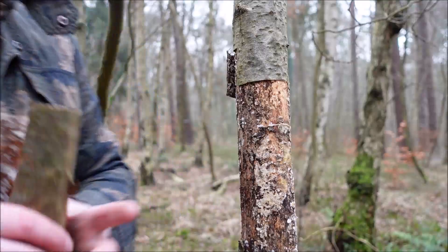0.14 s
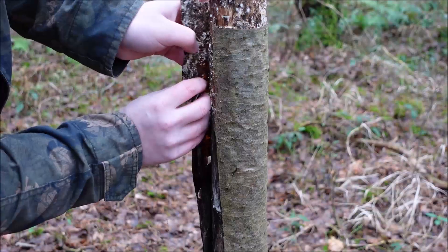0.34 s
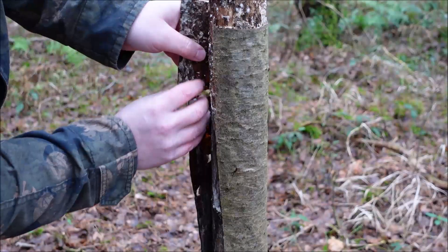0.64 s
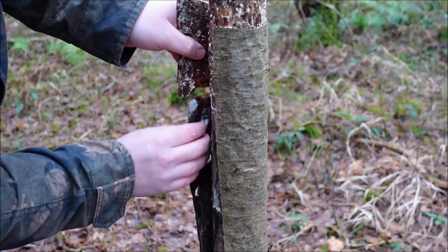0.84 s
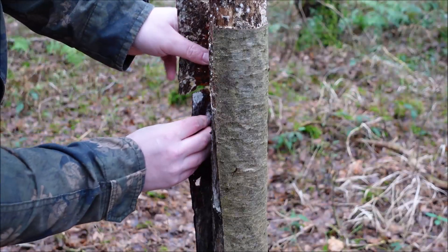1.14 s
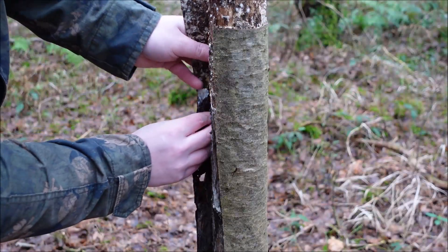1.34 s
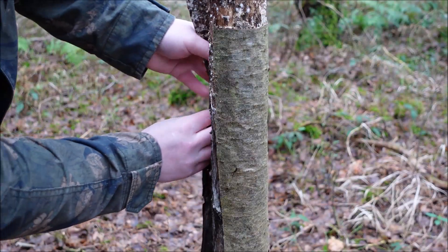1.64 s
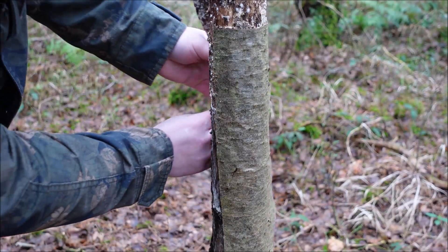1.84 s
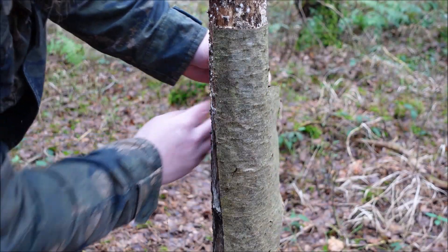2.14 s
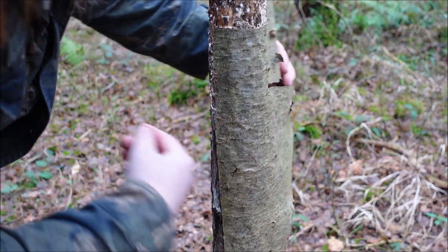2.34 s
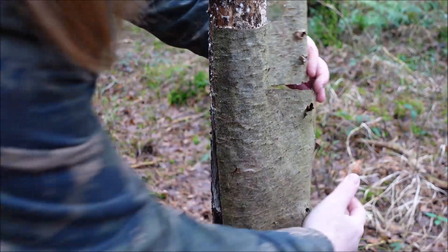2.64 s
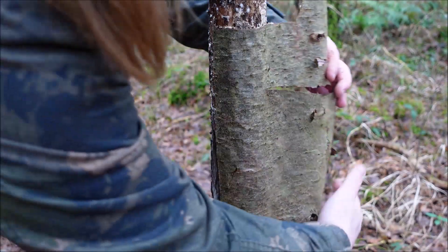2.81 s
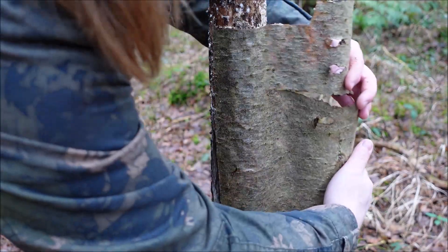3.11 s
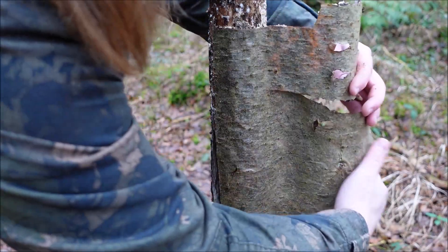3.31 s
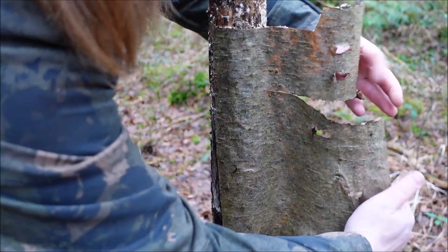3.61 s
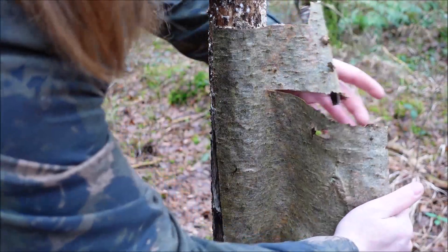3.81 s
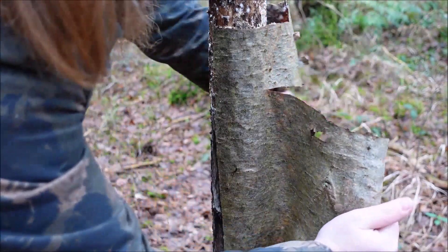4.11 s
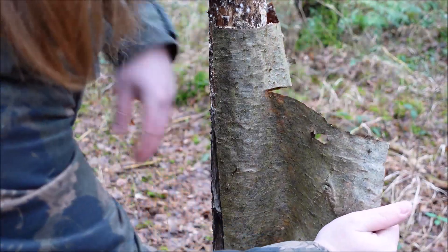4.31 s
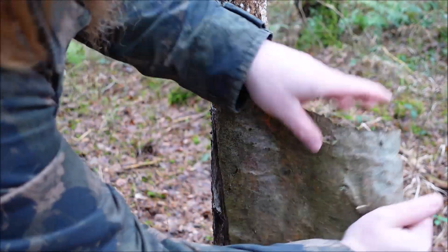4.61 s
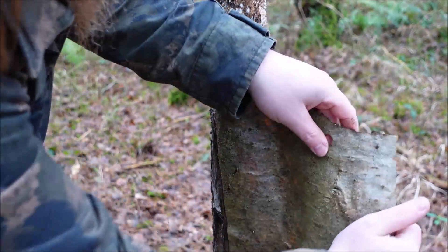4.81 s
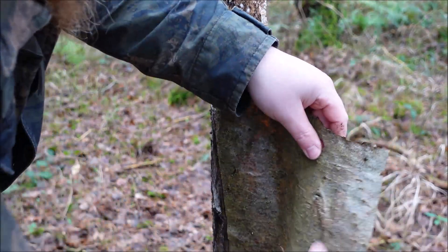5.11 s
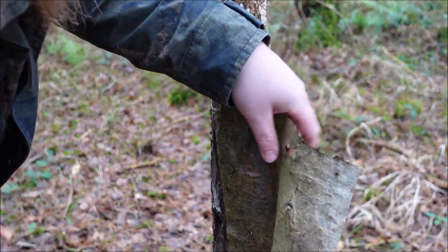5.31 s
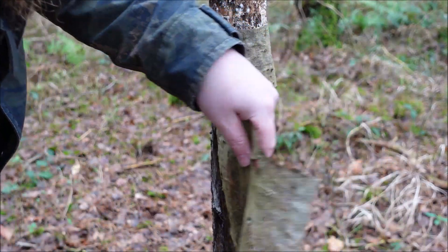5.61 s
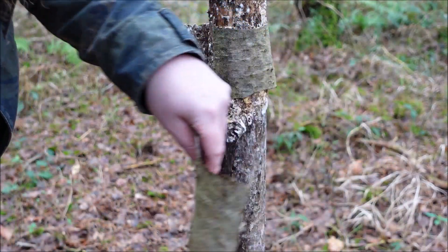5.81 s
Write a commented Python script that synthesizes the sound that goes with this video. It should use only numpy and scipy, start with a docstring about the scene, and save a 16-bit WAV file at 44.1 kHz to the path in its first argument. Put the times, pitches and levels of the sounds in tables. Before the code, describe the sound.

A sharp, close crack comes right at the start as hands peel stiff, dry bark from a thin trunk. Small irregular ticks and snaps follow, with clearer ones near 0.8, 1.2 and 2.1 seconds. Fingers scrape and rustle softly on the bark throughout. Around 2.7 seconds a sleeve swishes faintly, followed by a loud cluster of cracks at 2.8. Snaps then come more often, with strong ones near 3.6, 3.9 and 4.4 seconds. From about 4.5 to 4.8 seconds the sheet tears free in a dense, scraping rush of cracks, the loudest moment. The loose bark gives slightly hollow snaps and rustles, with another sharp cluster around 5.4 to 5.5 seconds and lighter ticks until about 6. A faint, steady, distant roar lies behind everything in the quiet wood.

```python
"""A sharp crack, then dry snaps one by one: two hands peel stiff bark from a thin trunk in a quiet wood.
Each fibre that breaks makes a tick, rings its patch of bark and shakes the whole curled sheet.
About 4.5 s in, the snaps come in a rush as the sheet tears free.
Fingers scrape and rustle on the bark, a sleeve swishes once, and a soft roar lies far behind."""
import sys
import numpy as np
from scipy import signal
from scipy.fft import rfft, irfft
from scipy.io import wavfile
from scipy.ndimage import uniform_filter1d

SR = 44100
rng = np.random.default_rng(int(sys.argv[2]) if len(sys.argv) > 2 else 0)


def transcribe(signal):
    """Save signal, clipped to [-1, 1], as a 16-bit WAV file at the path in sys.argv[1]."""
    frames = np.atleast_2d(signal).T
    limited = np.clip(frames, -1, 1)
    pcm = np.round(limited * 32767).astype(np.int16)
    wavfile.write(sys.argv[1], SR, pcm)


N = 262395
TIME = np.arange(N) / SR

# The main fibre snaps. Tick and thump are set against the bark's ring; decay is the time to fade 60 dB.
# (time [s], level [dB], pitch of the freed patch [Hz], tick [dB], thump [dB], decay [ms])
FIBRE_SNAPS = [(0.0421, -9.5, 2180, -8.5, -27, 7.3), (0.045, -17, 1050, -33, -48, 22),
               (0.112, -33.5, 4940, -4, -28, 4.3), (0.144, -29.5, 1120, -17, -26, 42),
               (0.213, -33, 1067, -20, -27.5, 38), (0.3727, -35.5, 2500, 2.5, -29.5, 28),
               (0.3856, -29, 2470, 1, -27, 16), (0.4, -27, 2400, -46, -35, 9.4),
               (0.4276, -31.5, 2340, 2.5, -39, 3.1), (0.5433, -28.5, 2430, -5.5, -40, 4.3),
               (0.6117, -32.5, 2180, -3.5, -38, 11), (0.677, -38, 2370, 7.5, -30, 4.3),
               (0.822, -16, 2000, 0.5, -50, 9.7), (0.9208, -30, 5460, -24, -36, 2.8),
               (1.024, -36, 5900, -0.5, -28, 1.7), (1.192, -15.5, 2170, -10, -42, 8.1),
               (1.1966, -18.5, 2070, -1.5, -41, 8.8), (1.2191, -26, 7500, -2, -28, 9.5),
               (1.2244, -28.5, 2250, -7, -10, 11), (1.2617, -17, 1900, -20, -8, 7.3),
               (1.2744, -30, 2040, -15, -27, 14), (1.4602, -30, 1072, -19, -38, 36),
               (1.513, -33, 1780, -9.5, -18, 18), (1.6492, -36, 1830, -9, -25, 21),
               (1.7125, -33.5, 4840, -5, -37, 4.5), (1.753, -33, 4700, -1, -33, 60),
               (1.9546, -32.5, 3950, -7, -6, 27), (1.9856, -27.5, 1017, -5.5, -10, 50),
               (1.9951, -26.5, 970, 1.5, -38, 5), (2.0709, -34, 6300, 11.5, -30, 4),
               (2.104, -30.5, 3980, -2, -17, 30), (2.1118, -14, 920, -66, -4, 23.5),
               (2.5213, -29.5, 796, -24, 1, 29), (2.7021, -13.5, 2140, -35, -49, 5.1),
               (2.784, -13, 2040, -8, -7.5, 7.3), (2.801, -21, 2060, -31, 1.5, 23),
               (2.82, -6, 2584, -15, -11.5, 9.2), (2.8234, -14, 1140, -21, -6, 20),
               (2.9624, -34, 1750, -28, -12, 19), (2.9795, -34, 3140, -5, -29, 2.9),
               (3.0403, -15.5, 2420, -18.5, -34, 3.9), (3.1479, -26.5, 2550, -27, -17, 13),
               (3.2308, -34.5, 1830, -8, -33, 11), (3.2677, -19.5, 2860, -5, -7, 24),
               (3.338, -21.5, 3160, -3, -12.5, 14.5), (3.3874, -33.5, 5840, 0, -24, 9.7),
               (3.4516, -29.5, 1590, -6, -3.5, 9.8), (3.563, -26, 2860, -12, -6, 47),
               (3.5765, -7.5, 1870, -15.5, -41, 7.8), (3.5819, -13.5, 1550, -20, -12.5, 9.4),
               (3.592, -22, 1900, -14, -6, 24), (3.6, -26.5, 4250, 1, -14, 20),
               (3.6218, -17, 2020, -4.5, -12, 4.9), (3.6601, -15.5, 3960, -9, -1, 12.2),
               (3.799, -33, 1940, -10, -20, 7.7), (3.9057, -15.5, 2420, -5, -16.5, 13.3),
               (3.9505, -22.5, 1590, -32, -3, 7.8), (3.9551, -13.5, 2240, -3, -11.5, 8.9),
               (4.077, -41.5, 960, 11, -24, 1.7), (4.146, -36.5, 946, -6.5, 4, 38),
               (4.2847, -25, 1110, -50, -14, 20), (4.3099, -34.5, 1400, -9.5, -3, 17),
               (4.391, -10.5, 2550, -11.5, -6.5, 11), (4.537, -18.5, 1680, 2, -5, 21),
               (4.5456, -8, 1850, -5.5, -21, 2.3), (4.5554, -9, 1150, -5.5, -6.5, 14),
               (4.56, -9, 2700, -3, -13, 8), (4.5776, -16.5, 1130, -13, -4, 15),
               (4.593, -11.5, 3200, -20, -17, 14), (4.598, -12.5, 3960, -3, -19, 22),
               (4.6044, -3, 3000, -16, -27, 2), (4.6097, -12, 1390, -12, -3.5, 23),
               (4.6288, -8, 1220, 0.5, -2.5, 4.1), (4.6425, -10, 1780, -24, -14, 11),
               (4.6463, -15.5, 2410, -7, -19, 40), (4.6515, -8, 1540, -9, -34, 4.5),
               (4.6622, -12, 1900, -25, -13, 7.7), (4.6785, -18, 3080, 4, -31, 2.7),
               (4.696, -9, 1140, -31, -9, 5.1), (4.729, -17, 1140, -43, -3.5, 13),
               (4.74, -18, 2080, -52, 4.5, 21.5), (4.7529, -19.5, 1340, -45, -2, 20),
               (4.9168, -22.5, 1246, -55, -2.5, 20.5), (4.9435, -24.5, 1335, -11.5, -9, 5.1),
               (4.9496, -27.5, 3920, -22, -28, 2.9), (4.9791, -34.5, 1340, -25, 4, 14),
               (5.0147, -21.5, 1420, -22, -32, 5.5), (5.1343, -28, 1930, -1.5, -1, 6.6),
               (5.086, -38, 970, -32, 4, 28), (5.1791, -30, 1280, -34, 4.5, 22),
               (5.2206, -25, 1460, -43, -4.5, 3.5), (5.2393, -16, 1056, -51, -15, 5.5),
               (5.2658, -16.5, 1343, -5, -29, 37), (5.3632, -27.5, 1560, -27, -1.5, 13),
               (5.3877, -20, 4700, 1, -11, 18), (5.4115, -14.5, 2450, -0.5, -42, 9.4),
               (5.4217, -13, 5100, -10, -9.5, 6.3), (5.4272, -18, 7310, 2.5, -6.5, 12.5),
               (5.452, -30, 2360, -29, -28, 5.4), (5.4626, -19, 2500, -0.5, -22, 5.6),
               (5.4691, -9, 2650, -16, -11, 4.2), (5.4969, -17, 5430, -6, -33, 1.9),
               (5.517, -6, 2800, -4.5, -18, 3.7), (5.5197, -15.5, 733, -14, -11, 11.4),
               (5.5495, -22, 2900, -6, -26, 7.4), (5.6276, -33.5, 5100, 0.5, -4, 20),
               (5.699, -34, 4650, 12, -31, 2.9), (5.7457, -28, 1900, 0.5, -40.5, 5.9),
               (5.7535, -25, 2690, -4.5, -30, 23), (5.8155, -26.5, 4940, -24, -24, 3.5),
               (5.877, -27.5, 1845, -15.5, -6, 9.9), (5.8952, -17, 1317, -3, -19, 19),
               (5.9001, -24, 5100, -15, -20, 21), (5.9292, -22.5, 1840, -5.5, -30, 5.3)]


def snapping_fibres():
    """Fibres break near the middle; the treble differs a little between left and right."""
    snaps = FIBRE_SNAPS + small_snaps(count=130)
    samples = 2000
    noises = rng.standard_normal((len(snaps), 4, samples))
    pans = rng.standard_normal(len(snaps))
    mid, side = np.zeros((2, N + samples))
    for snap, noise, pan in zip(snaps, noises, pans):
        sound = fibre_snap(*snap, noise)
        at = round(snap[0] * SR)
        mid[at:at + samples] += sound
        side[at:at + samples] += pan * (0.035 * sound + 0.2 * np.gradient(sound))
    return np.array([mid + side, mid - side])[:, :N]


def fibre_snap(time_s, level_db, hz, tick_db, thump_db, decay_ms, noise):
    """A fibre lets go in a dying burst: it ticks, rings its patch of bark and shakes the sheet."""
    t = np.arange(noise.shape[1]) / SR
    attack = 1 - np.exp(-t / (.000015 * decay_ms))  # long scuffing breaks start softer
    burst = attack * gain_of(-60000 * t / max(decay_ms, 2))
    fray = attack * gain_of(-27.5 - 60 * t / 0.072)  # finer fibres follow the break
    tone = peaked(np.sin(2 * np.pi * hz * t) * burst)  # the patch springs back
    shaken = peaked(ring(ring(noise[0] * burst, hz, 0.18 * hz), hz, 1.35 * hz))
    bark_around = peaked(ring(ring(noise[1] * (burst + fray), 1170, 1400), 2810, 3470))
    sharpness = gain_of(.3 * tick_db)  # a sharp break wakes the whole bark, a dull one mostly its patch
    bark = peaked(tone + 0.9 * sharpness * shaken) + 1.24 * sharpness * bark_around
    bark = peaked(cut_bass(cut_treble(bark, 1500 + 2.26 * hz), 520, order=4))
    tick_shape = attack * gain_of(-60000 * t / max(0.31 * decay_ms, 2)) + fray
    tick = ring(ring(noise[2] * tick_shape, 4040, 4100), 5650, 5600)
    tick = peaked(cut_treble(tick, 13800))
    thump = sheet_thump(noise[3] * burst, loose=time_s > 4.1)
    return gain_of(level_db) * (bark + gain_of(tick_db) * tick + gain_of(thump_db) * thump)


# The low notes at which the curled sheet rings: (pitch [Hz], width [Hz], level [dB])
SHEET_NOTES = [(442, 350, 5), (722, 413, 16)]


def sheet_thump(jolt, loose):
    """A snap shakes the sheet; the trunk holds back its lowest flap until the sheet comes loose."""
    flap_db, bass_cut_hz = (5, 90) if loose else (-8.5, 150)
    notes = SHEET_NOTES + [(255, 148, flap_db)]
    thump = sum(gain_of(db) * unit_level(ring(ring(jolt, hz, width), hz, 3 * width))
                for hz, width, db in notes)
    return cut_bass(peaked(thump), bass_cut_hz)


def small_snaps(count):
    """Random rows like FIBRE_SNAPS: smaller fibres break more often and louder where the hands work."""
    power = hand_power().sum(0)
    effort = np.cumsum(power ** 0.35)  # a higher exponent packs more snaps into the hard strokes
    jitter, size, pitch, tick, thump, decay = rng.random((count, 6)).T
    times = np.interp((np.arange(count) + jitter) / count, effort / effort[-1], TIME)
    rub_db = 10 * np.log10(np.interp(times, TIME, power))
    level_db = rub_db + 6 - 4 * np.log(size + 0.028)  # many quiet ones, a few loud
    hz = 938 * (5500 / 938) ** pitch
    tick_db = np.interp(tick, (0, 1), (-35.5, 3.5))
    thump_db = np.interp(thump, (0, 1), (-24, -7.5))
    decay_ms = np.interp(decay, (0, 1), (1.6, 17))
    return list(zip(times, level_db, hz, tick_db, thump_db, decay_ms))


def tear_power(start_s=4.537, end_s=4.69, rise_s=.06, fall_s=.03, scrape_db=-31, rustle_db=-34):
    """The sheet rips free: scrape and rustle rise, hold and drop away."""
    rip = np.clip(np.minimum((TIME - start_s) / rise_s, (end_s - TIME) / fall_s), 0, 1)
    return power_pair(scrape_db, rustle_db) * rip ** 2


# Each drag of the hands on the bark: (middle time [s], length [s], scrape [dB], rustle [dB])
HAND_STROKES = [(0.15, .16, -48, -57.5), (0.28, .06, -52, -56.5), (0.388, .06, -64.5, -50),
                (0.536, .06, -56, -57), (0.741, .26, -54.5, -53.5), (0.958, .06, -55, -61),
                (1.128, .07, -46, -53.5), (1.272, .05, -49, -44), (1.396, .08, -54.5, -52.5),
                (1.48, .08, -51, -52), (1.71, .16, -54.5, -55), (1.88, .08, -55, -57),
                (1.967, .12, -52, -56), (2.1, .08, -50.5, -52), (2.375, .08, -57.5, -59.5),
                (2.712, .26, -51, -58), (2.98, .08, -49, -53), (3.133, .07, -47, -51),
                (3.388, .14, -51, -49), (3.6, .12, -46.5, -47), (4.045, .12, -58, -60),
                (4.302, .08, -54, -70), (4.769, .1, -46, -57), (4.959, .14, -50, -54),
                (5.189, .12, -49, -57), (5.262, .03, -37, -43), (5.474, .2, -45, -50),
                (5.764, .12, -50.5, -49.5), (5.92, .1, -50, -54)]


def hand_power():
    """How strong scrape and rustle are over time as the hands rest, stroke and tear."""
    power = power_pair(scrape_db=-60, rustle_db=-64) + tear_power()  # resting hands, plus the tear
    for middle_s, length_s, scrape_db, rustle_db in HAND_STROKES:
        power += power_pair(scrape_db, rustle_db) * swell(middle_s, length_s)
    return power


def flake_power(decay_s=0.088):
    """Loose flakes scrape and rustle briefly after each main snap, far quieter than the snap."""
    kicks = np.zeros(N)
    for time_s, level_db, *_ in FIBRE_SNAPS:
        kicks[round(time_s * SR)] = gain_of(level_db) ** 2
    shiver = signal.lfilter([1], [1, -gain_of(-120 / (decay_s * SR))], kicks)
    return power_pair(scrape_db=-25, rustle_db=-37) * shiver


# The tone colour of the coarse scrape: (frequency [Hz], level [dB])
SCRAPE_COLOUR = [(300, -13), (700, 2.5), (1200, 4.5), (2500, 1.5), (4500, -29)]
# The tone colour of the fine rustle: (frequency [Hz], level [dB])
RUSTLE_COLOUR = [(1500, -3.5), (3500, 9), (5500, 5.5), (9000, -0.5), (12000, -15.5), (16000, -32)]


def rubbing():
    """Skin and cloth drag on rough bark and flakes settle, with a coarse and a fine grain."""
    scrape_power, rustle_power = hand_power() + flake_power()
    scrape = uneven_contact(tiny_slips(SCRAPE_COLOUR, per_s=500, spread_db=1.8, swish=3.5, stereo=.11))
    rustle = uneven_contact(tiny_slips(RUSTLE_COLOUR, per_s=600, spread_db=2.5, swish=2.5, stereo=.15))
    return np.sqrt(scrape_power) * scrape + np.sqrt(rustle_power) * rustle


def tiny_slips(colour, per_s, spread_db, swish, stereo):
    """Tiny slips of uneven size, each a short puff of noise, over a smooth swish."""
    sizes = gain_of(spread_db * np.minimum(rng.exponential(1, N), 5))
    slips = sizes * (rng.random(N) < per_s / SR)
    puffs = swish + unit_level(signal.lfilter([1], [1, -.97], slips))
    mid, side = rng.standard_normal((2, N)) * puffs
    return coloured(np.array([mid + stereo * side, mid - stereo * side]), colour)


def uneven_contact(x, depth_db=4):
    """Uneven touch makes the colour drift in blotches about 1 kHz wide and some tens of ms long."""
    spectrum = signal.stft(x, nperseg=256, noverlap=192)[2]
    blotches = uniform_filter1d(rng.standard_normal(spectrum.shape[1:]), size=7, axis=0)
    blotches = unit_level(uniform_filter1d(blotches, size=16, axis=1))
    uneven = signal.istft(spectrum * gain_of(depth_db * blotches), nperseg=256, noverlap=192)[1]
    return unit_level(uneven[:, :N])


# The tone colour of sliding cloth: (frequency [Hz], level [dB])
CLOTH_COLOUR = [(1000, -10), (3000, 2), (6000, -1.5), (10000, -4.5), (13000, -14), (16000, -16)]


def sleeve(middle_s=2.74, length_s=0.27, level_db=-51):
    """Cloth slides once over cloth: an airy hiss without grain."""
    mid, side = rng.standard_normal((2, N))
    hiss = coloured(np.array([mid + 0.16 * side, mid - 0.11 * side]), CLOTH_COLOUR)
    return gain_of(level_db) * np.sqrt(swell(middle_s, length_s)) * hiss


# The tone colour of the far roar: (frequency [Hz], level [dB])
ROAR_COLOUR = [(30, -8), (100, -25), (250, -13), (550, -16.5), (950, 0), (1400, -6), (3000, -14.5),
               (6000, -22), (16000, -30)]
# How alike the roar is on the left and right: (frequency [Hz], likeness [0 to 1])
ROAR_LIKENESS = [(60, 0.085), (550, 0.75), (5000, 0.65), (15000, 1)]


def far_roar(level_db=-54.5):
    """Steady noise from far away, partly alike in both ears."""
    mid, side = rfft(rng.standard_normal((2, N)))
    likeness = np.clip(per_frequency(ROAR_LIKENESS), 0, 1)
    side *= np.sqrt((1 - likeness) / (1 + likeness))
    noise = irfft(np.array([mid + side, mid - side]), N)
    return gain_of(level_db) * coloured(noise, ROAR_COLOUR)


def gain_of(db):
    """Turns decibels into a volume factor."""
    return 10 ** (np.asarray(db) / 20)


def power_pair(scrape_db, rustle_db):
    """Turns two levels into powers: scrape in the first row, rustle in the second."""
    return gain_of([[scrape_db], [rustle_db]]) ** 2


def swell(middle_s, length_s):
    """The power of a movement that rises and falls smoothly."""
    return np.exp(-(2 * (TIME - middle_s) / length_s) ** 2)


def unit_level(x):
    """Scales a sound to an average power of 1."""
    return x / np.sqrt(np.mean(x ** 2) + 1e-20)


def peaked(x):
    """Scales a sound so that its loudest moment swings to about 1."""
    return x / np.sqrt(2 * uniform_filter1d(x ** 2, size=30).max() + 1e-20)


def per_frequency(points):
    """Joins a table's points with straight lines on a log-frequency axis."""
    hz, value = np.transpose(points)
    return np.interp(np.log(np.fft.rfftfreq(N, 1 / SR) + 1), np.log(hz + 1), value)


def coloured(x, colour):
    """Gives a sound a tone colour and an average power of 1."""
    return unit_level(irfft(rfft(x) * gain_of(per_frequency(colour)), N))


def ring(x, hz, width_hz):
    """Rings at one pitch; the wider the band, the sooner it dies away."""
    r = np.exp(-np.pi * width_hz / SR)
    return signal.lfilter([1, 0, -r], [1, -2 * r * np.cos(2 * np.pi * hz / SR), r ** 2], x)


def cut_treble(x, hz):
    """Turns down everything above hz."""
    return signal.lfilter(*signal.butter(3, min(hz, 20000), fs=SR), x)


def cut_bass(x, hz, order=2):
    """Turns down everything below hz."""
    return signal.lfilter(*signal.butter(order, hz, "high", fs=SR), x)


def scene():
    """Snapping fibres, rubbing hands and a sleeve over the far roar."""
    balance = gain_of([[-.2], [.2]])  # the snaps lean a touch to the right
    return snapping_fibres() * balance + rubbing() + sleeve() + far_roar()


def record(dry):
    """Small microphones lose the deep bass; the loudest snaps are rounded off and the top treble cut."""
    ceiling, bass_hz, top_hz = .8, 105, 15900
    rounded = ceiling * np.tanh(cut_bass(dry, bass_hz) / ceiling)
    top_cut = signal.firwin(255, top_hz, window=("kaiser", 9), fs=SR)
    return signal.oaconvolve(rounded, top_cut[None], "same")


dry = scene()
out = record(dry)
transcribe(out)
```